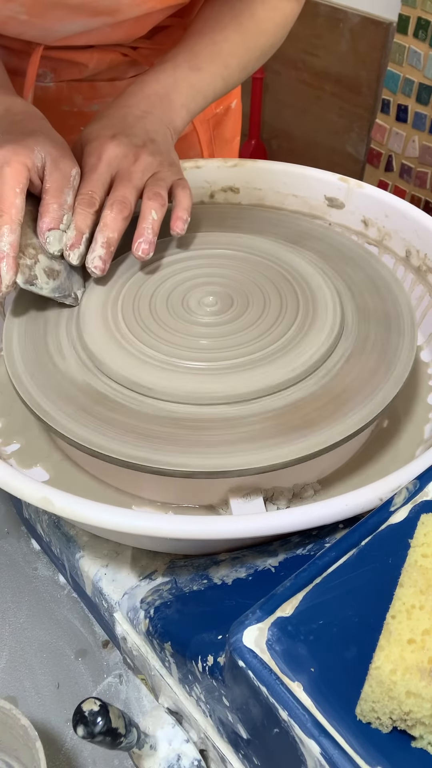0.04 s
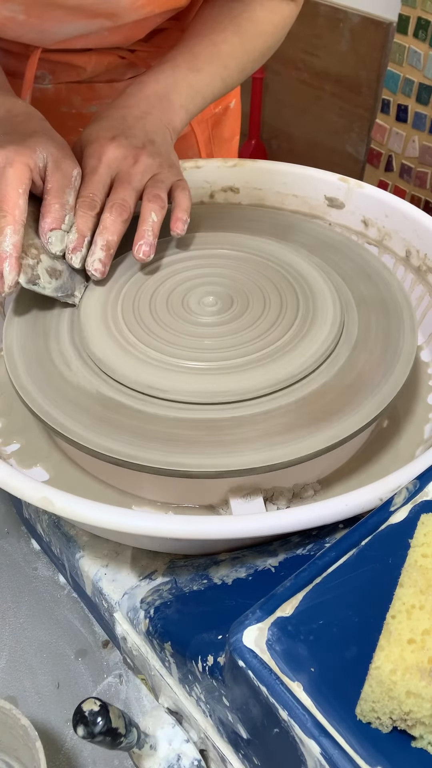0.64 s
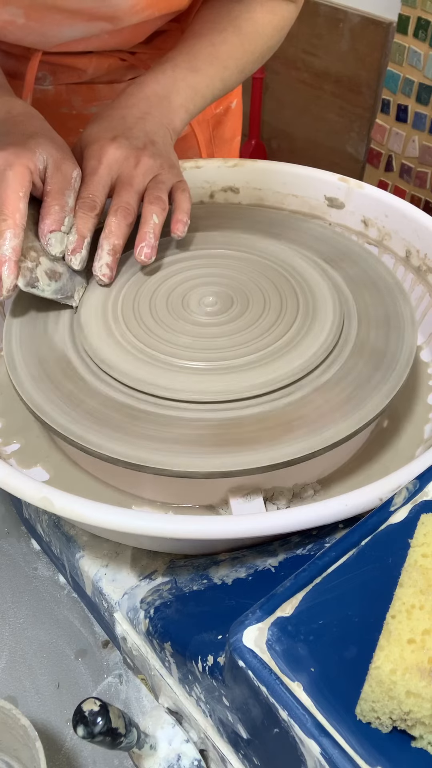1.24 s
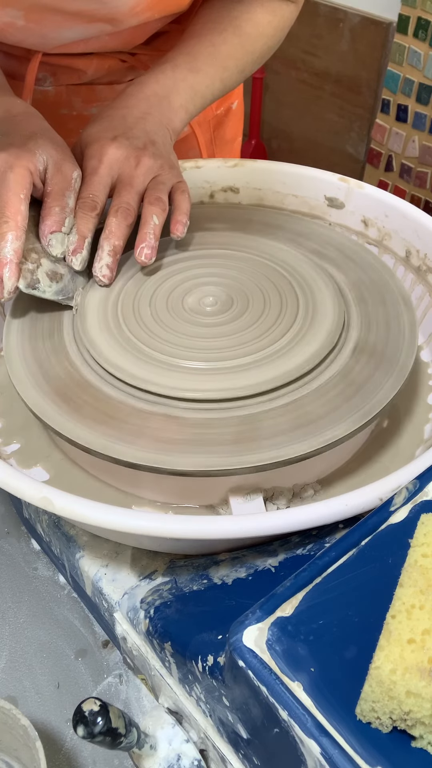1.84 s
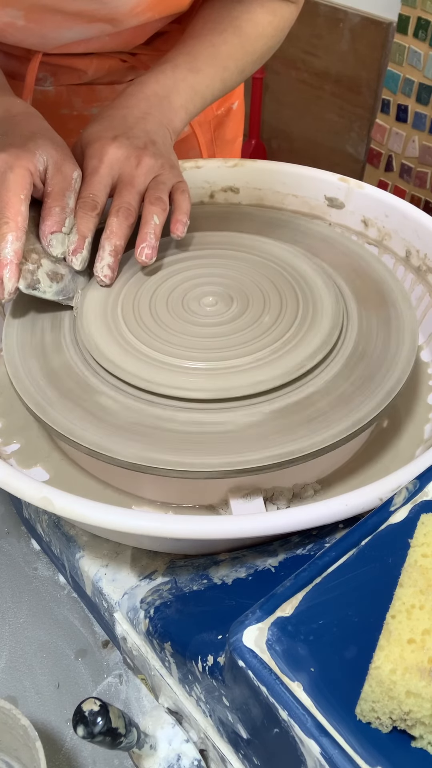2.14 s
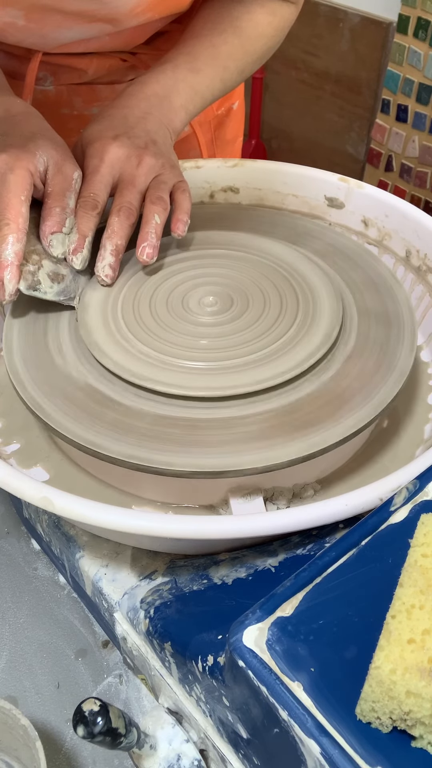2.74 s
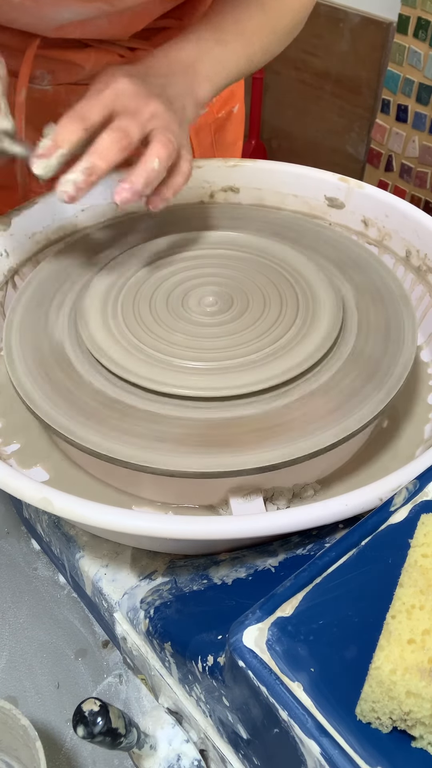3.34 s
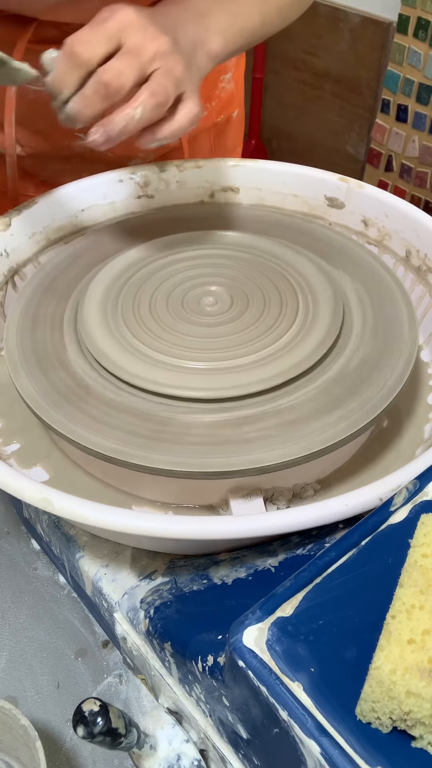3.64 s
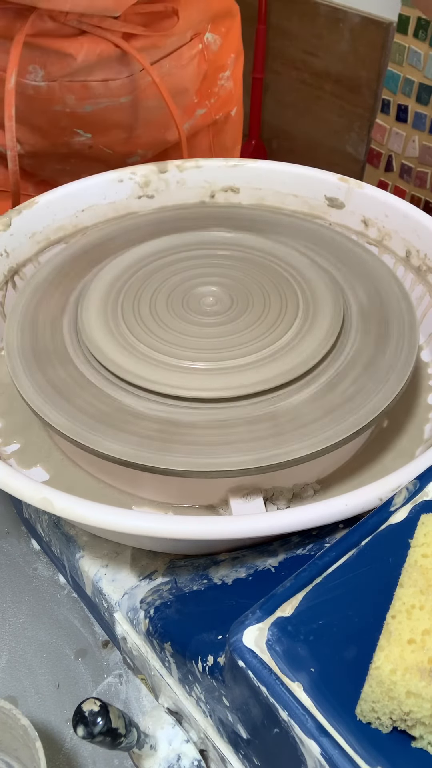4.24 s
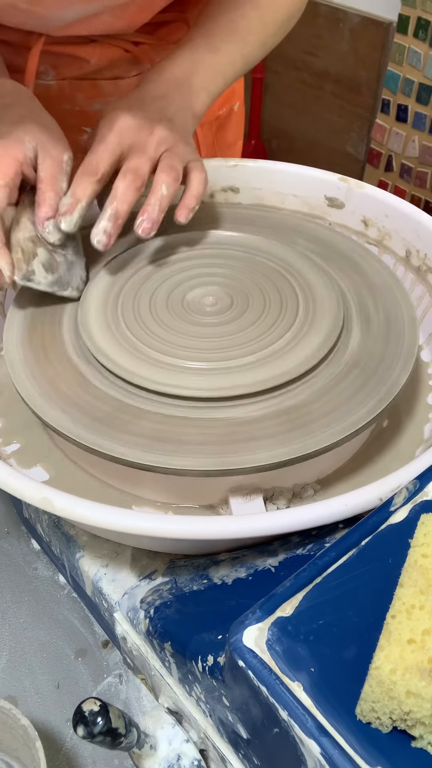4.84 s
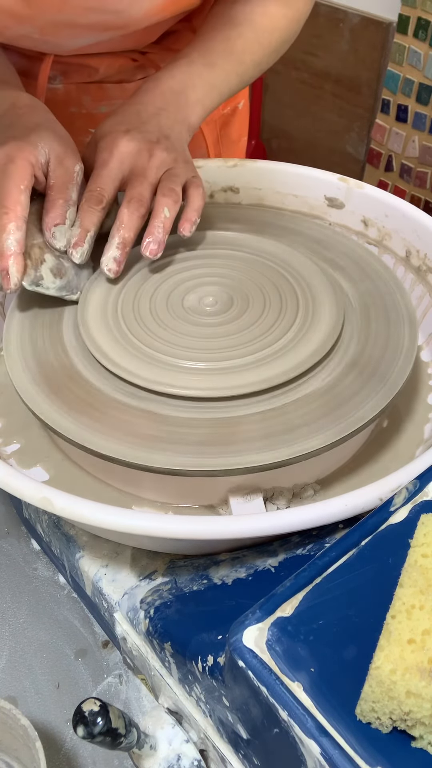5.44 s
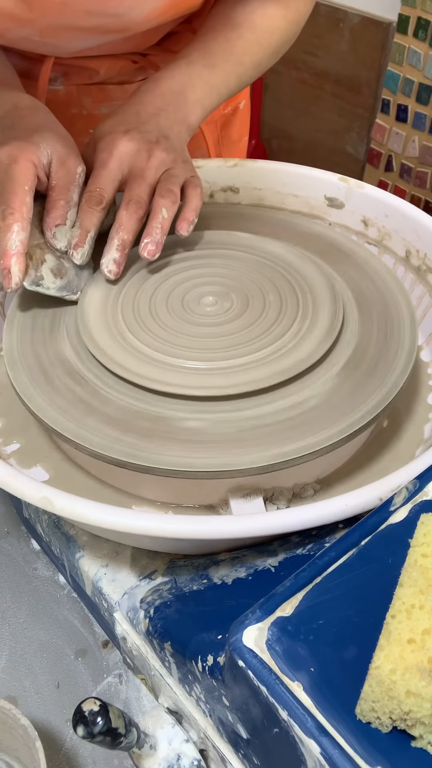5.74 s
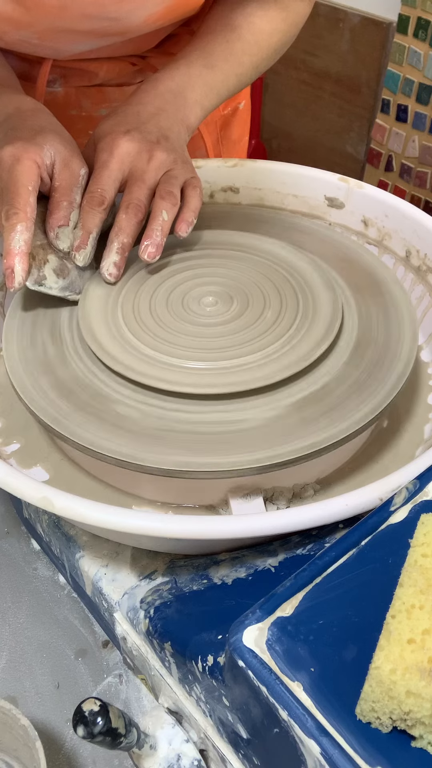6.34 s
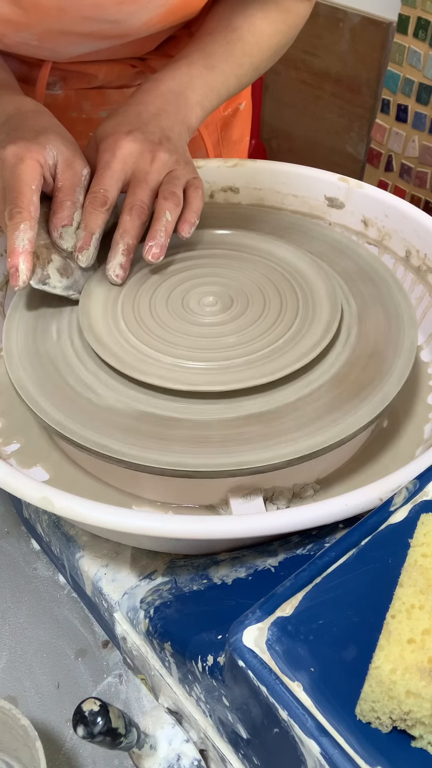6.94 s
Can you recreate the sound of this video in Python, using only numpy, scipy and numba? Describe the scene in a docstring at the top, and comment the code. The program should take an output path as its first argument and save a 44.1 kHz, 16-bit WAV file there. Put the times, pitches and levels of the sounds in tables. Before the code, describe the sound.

Gritty hiss of a blade on spinning wet clay stops for a whining wheel motor and a dull knock, then starts again.

```python
"""First comes the gritty hiss of a flat blade scraping wet clay on a humming electric potter's wheel.
There are two long strokes, heard close to a phone in a small room. Grit hisses under the blade and the
drag of the clay shakes the wheel; the brushed motor slows under load and whines up when freed.
In the pause a tool is put down beside the wheel, whose housing gives one dull, hollow knock."""
import sys
import numpy as np
from scipy import signal
from scipy.fft import rfft, irfft, next_fast_len
from scipy.io import wavfile
from scipy.ndimage import uniform_filter1d
from numba import njit

SR = 44100
rng = np.random.default_rng(int(sys.argv[2]) if len(sys.argv) > 2 else 0)


def digitize_waveform(pressure):
    """Quantize a signal to 16-bit integers and store it at the path in sys.argv[1].

    Rows of a 2-D input are taken as channels; values are limited to [-1, 1].
    """
    field = np.atleast_2d(pressure).T
    bounded = np.clip(field, -1, 1)
    quanta = np.round(bounded * 32767).astype(np.int16)
    wavfile.write(sys.argv[1], SR, quanta)


N = 317961
T = np.arange(N) / SR
SIZE = next_fast_len(N + SR // 2)
FREQ = np.maximum(np.arange(SIZE // 2 + 1) * SR / SIZE, 1)

# Tone (how strong the lows and highs are) of the wheel's running sounds: pitch_hz, level_db
RUMBLE_TONE = [(20, -48), (40, -30), (60, 4.5), (80, -12), (105, 2), (135, 4.5), (175, -2.5), (260, -28),
               (600, -58)]
AIR_TONE = [(60, 1), (180, -8), (300, 0), (520, -1), (750, 7), (960, 11), (1150, 1), (1450, 4), (1750, -4),
            (2400, -1), (3000, -7), (4200, -10), (5400, -6), (7000, -7), (11000, -15), (13000, -22),
            (16000, -34)]
WHINE_TONE = [(180, -4), (520, 5), (780, 2.5), (1100, 4), (1600, -8), (2800, 0), (3300, -2), (3700, -13.5),
              (5500, -36), (7500, -22), (11000, -24), (15000, -25)]
BUZZ_TONE = [(1000, 3), (1800, -1), (2300, -4), (2900, -5), (3500, 0), (4200, -2), (4800, 7), (6000, 4),
             (7500, -4), (11000, 0), (15000, -13)]
SWISH_TONE = [(1000, -30), (2400, -13), (3300, -14), (4200, -24), (5200, -9), (6400, -2), (7500, -3),
              (10000, -5), (12000, -22), (16000, -30)]
# Tone of a blow on the housing: pitch_hz, level_db
CRACK_TONE = [(150, -10), (400, 0), (900, 3), (1800, -2), (2800, -16), (3600, -6), (4600, -3), (5300, -2),
              (6000, 2), (7200, -6), (10500, -7), (15000, -10)]
CLUNK_TONE = [(120, -16), (380, -5), (750, -7), (1800, -10), (2800, -21), (9000, -28)]
# Tone of the grit, the ringing blade, the wet clay and the shaking wheel: pitch_hz, level_db
GRIT_TONE = [(600, -25), (1500, -5), (2400, 0), (2650, -5), (4000, -3), (4400, 0), (5250, 3), (6200, -.5),
             (7200, .5), (9000, 0), (11500, -6.5), (14000, -10.5), (15000, -12.5)]
RING_TONE = [(1500, -19.5), (2800, -1), (3300, 5), (3700, -19.5), (6000, -21.5)]
SMEAR_TONE = [(200, -28.5), (330, 9.5), (450, -0.5), (620, -0.5), (800, 2), (1100, -2), (1600, -0.5),
              (2400, -2), (4000, -34), (9000, -65)]
SHUDDER_TONE = [(50, -12), (130, 0), (190, -3), (255, -3), (300, 0), (350, 2.5), (440, -6), (520, -6),
                (700, -15), (2000, -43)]
# Where the motor, its brushes, the wheel and the blade ring: pitch_hz, width_hz, boost_db
MOTOR_PEAKS = [(224, 22, 23.5), (740, 90, 5), (904, 44, 20.5), (980, 45, 6), (1033, 70, 11), (1290, 40, 13),
               (1550, 70, 9), (1810, 60, 9), (2070, 70, 9.5), (2340, 160, 12.5), (2850, 150, 6)]
BRUSH_PEAKS = [(2380, 200, 4), (3650, 150, 5), (4900, 150, 6), (5200, 130, 5), (6600, 150, 5),
               (7500, 150, 3), (7850, 250, -7), (8200, 170, 8), (8840, 250, -7), (9400, 150, 12),
               (10250, 250, -5), (11150, 250, 6), (11900, 200, 7)]
WHEEL_PEAKS = [(226, 15, 5), (304, 34, 7), (603.6, 23, 4), (686, 44, 3), (770, 49, 4), (1035, 53, 4.5),
               (1260, 83, 4), (1985, 40, 3)]
BLADE_PEAKS = [(3300, 380, 6), (4350, 250, 2), (5200, 400, 2), (7350, 600, 3), (7880, 250, -8),
               (8300, 400, 2.5), (9050, 300, 3), (9800, 250, 3), (10200, 220, -7), (10500, 500, 4.5),
               (12600, 400, 5)]
# Slow swell of the rumble: time_s, level_db
RUMBLE_SWELL = [(0, 2.5), (1.3, 1.5), (1.6, 0), (3.7, -1), (4.4, -0.5), (5.2, -1), (7.2, 1.5)]
# Two faint taps, then a hollow knock and its quick rebounds: start_s, strength_db, cutoff_hz
KNOCKS = [(3.35, -24, 1900), (3.541, -23, 1800), (4.0892, 7, 9000), (4.096, -6.5, 3000), (4.1291, -2, 380),
          (4.147, -9, 2200), (4.159, -1.5, 360), (4.1656, -4.5, 360), (4.1922, -11, 420)]
# Notes the housing rings with: pitch_hz, level_db, fade_s (time to fall by 60 dB)
HOUSING_NOTES = [(113, -21, .3), (172, -10, .1), (268, -8, .06), (301, -5, .1), (345, -10, .07),
                 (385, -14, .08), (538, -7, .07), (587, -3, .08), (650, -7, .05), (730, -3, .045),
                 (786, 1, .055), (850, -8, .045), (1035, -4, .08), (1222, -11, .07), (1270, -11, .055),
                 (1464, -15, .08), (1760, -12, .08), (2250, -14, .07), (2430, -14, .06), (5950, -12, .02)]
# Strokes of the blade, the first already under way: touch_s, lift_s
STROKES = [(-.41, 3.04), (4.934, 7.5)]
# The hand's work, one list a stroke: time_s, pressure_db, drag_db, hollow_pitch_hz
HAND_MOVES = [
    [(0, 3.5, -2.5, 940), (.12, 5, -1.5, 970), (.22, 4, 2, 810), (.5, 1.5, -4.5, 750), (.62, -1, -11, 745),
     (.77, -0.5, -7, 750), (.81, 5.5, 1, 766), (1.2, 6, 0, 770), (1.42, 6.5, -3.5, 736), (1.55, 7, 2, 690),
     (1.7, 3.5, -4.5, 760), (1.95, 5, -2.5, 614), (2.2, 4.5, -4, 810), (2.33, 5.5, -1, 780),
     (2.84, 5, -2.5, 706), (2.94, 7.5, 5, 706)],
    [(4.97, 2, -0.5, 920), (5.05, 2.5, 7, 1150), (5.15, 3, 2.5, 1030), (5.225, 8, 8, 710),
     (5.265, 7.5, 3, 885), (5.31, 4.5, 6.5, 740), (5.44, 1, -1, 700), (5.72, 1.5, 1.5, 675),
     (5.86, 1, -2.5, 680), (6.13, 0, -0.5, 637), (6.57, 2.5, 0, 543), (6.66, -2, -1.5, 560),
     (6.87, 0, .5, 613), (7.01, -2.5, -1.5, 590), (7.15, 3.5, 4, 620)],
]
# Wet lumps that catch under the blade: middle_s, level_db, pitch_hz, half_length_s
LUMPS = [(.085, -46, 1250, .035), (.23, -51, 1850, .05), (.383, -45.5, 745, .045), (.555, -51, 760, .035),
         (.83, -50, 770, .045), (1.01, -49, 730, .035), (1.071, -49, 305, .054), (1.17, -49, 1040, .04),
         (1.62, -50, 300, .045), (1.958, -51.5, 540, .04), (2.331, -52, 313, .07),
         (2.622, -49.5, 704, .053), (2.752, -47.5, 460, .034), (2.944, -49, 725, .071),
         (3.013, -52, 515, .053), (5.075, -49, 1300, .04), (5.135, -49, 1090, .045),
         (5.161, -51, 330, .073), (5.19, -47, 690, .045), (5.245, -48, 1260, .04), (5.785, -53, 650, .05),
         (6.055, -49, 128, .052), (6.07, -52, 350, .05), (6.14, -51, 305, .05), (6.77, -49, 330, .059),
         (7.169, -44.5, 338, .086)]
# Coarse grains that crack under the blade: start_s, level_db, rise_s
SNAPS = [(6.2505, -32.5, .0003), (6.9364, -29.5, .0006), (7.1484, -29.5, .0007)]
# Hollows between blade, fingers and clay: pitch_multiple, width_share (of their pitch), level_db
HOLLOWS = [(1, 0.088, 4.5), (1.68, 0.23, -2), (2.7, 0.3, -6)]

FREE_HZ, LOADED_HZ = 258.8, 187  # brush ticks a second: motor running free, and fully loaded
TICKS_PER_TURN, BEARING_CYCLES_PER_TURN = 16, 57.7
HISS_DB, RING_DB, SMEAR_DB, SHUDDER_DB = -52, -57.5, -56, -60  # before pressure and drag are added


def amp(db):
    """Turn decibels into a gain."""
    return 10 ** (np.asarray(db) / 20)


def unit(x):
    """Scale to an average (rms) level of 1."""
    return x / np.sqrt(np.mean(x ** 2))


def curves(table):
    """Join each column's points with straight lines in time."""
    times, *columns = np.transpose(table)
    return [np.interp(T, times, column) for column in columns]


def wobble(per_s):
    """A smooth random wobble of size about 1."""
    hold = max(int(SR / per_s), 2)
    steps = np.repeat(rng.standard_normal(N // hold + 1), hold)
    return unit(uniform_filter1d(steps, hold)[:N])


def shape(x, tone, peaks=()):
    """Filter a sound to a broad tone with narrow peaks and dips on top."""
    hz, db = np.transpose(tone)
    db = np.interp(np.log(FREQ), np.log(hz), db)
    for centre, width, boost in peaks:
        db = db + boost / (1 + (2 * (FREQ - centre) / width) ** 2)
    # this folding makes the filter ring after a hit, never before it
    cepstrum = irfft(np.log(amp(db)), SIZE)
    cepstrum[1:SIZE // 2] *= 2
    cepstrum[SIZE // 2 + 1:] = 0
    return irfft(rfft(x, SIZE) * np.exp(rfft(cepstrum)), SIZE)[..., :N]


def grains(per_s, spread_db):
    """Many tiny hits of unequal size."""
    hits = (rng.random(N) < per_s / SR) * rng.standard_normal(N)
    return unit(hits * amp(spread_db * rng.standard_normal(N)))


def tick_train(ticks):
    """One sharp tick a cycle, made of 60 equally strong harmonics."""
    phase = np.pi * (ticks % 1 - .5) + 1e-9
    return np.sin(121 * phase) / np.sin(phase) - 1


@njit
def resonance(x, hz, width_share):
    """Let through only a band around a moving pitch."""
    y, band, low = np.empty(len(x)), 0., 0.
    for i in range(len(x)):
        g = np.tan(np.pi * hz[i] / SR)
        v = (band + g * (x[i] - low)) / (1 + g * (g + width_share))
        band, low, y[i] = 2 * v - band, low + 2 * g * v, width_share * v
    return y


def place(x, near_db, room_db, pan_db=0, left_delay_s=.000114):
    """Sound reaches the right microphone first; the nearby splash pan and the room add echoes."""
    t = T[:SR // 2]

    def tail(noise, fade_s):
        return rfft(unit(noise * amp(-60 * t / fade_s) * (t > .002)), SIZE) / np.sqrt(len(t))

    near, low, high = rng.standard_normal((3, 2, len(t)))
    dull = 1 / (1 + (FREQ / 2500) ** 2)
    room = np.sqrt(dull) * tail(low, fade_s=.42) + .03 * np.sqrt(1 - dull) * tail(high, fade_s=.33)
    echoes = amp(near_db) * tail(near, fade_s=.05) * FREQ / (FREQ + 500) + amp(room_db) * room
    alike = 1 / (1 + (FREQ / 800) ** 2)  # long waves reach both microphones alike
    echoes = np.array([echoes[0], alike * echoes[0] + np.sqrt(1 - alike ** 2) * echoes[1]])
    direct = np.exp(-2j * np.pi * FREQ * np.array([[left_delay_s], [0]]))
    balance = amp(np.array([[pan_db], [-pan_db]]) / 2)
    return irfft(rfft(x, SIZE) * (direct + echoes), SIZE)[:, :N] * balance


def hand():
    """Pressure (dB), drag (dB) and the pitch of the hollow under the blade (Hz) over time."""
    return curves([point for stroke in HAND_MOVES for point in stroke])


def contact(bite_s=.0067, lift_s=.099):
    """How fully the blade lies on the clay, 0 to 1: a quick bite, a hold and a slower lift."""
    return sum(np.clip(np.minimum((T - touch) / bite_s, (lift - T) / lift_s), 0, 1)
               for touch, lift in STROKES)


def rumble_and_air():
    """Bearings rumble through the frame, louder under the blade; cooling air rushes through the motor."""
    rumble = unit(shape(rng.standard_normal(N), RUMBLE_TONE))
    rumble *= amp(-59 + curves(RUMBLE_SWELL)[0] + 2 * contact() + .31 * wobble(6.7))
    air = unit(shape(rng.standard_normal(N), AIR_TONE)) * amp(-58 + wobble(11))
    return place(rumble, near_db=-12, room_db=-17, pan_db=2) + place(air, near_db=-20, room_db=0)


def motor_rate(sag_hz_per_s=36, rise_before_lift_s=.44, recover_s=.59):
    """Brush ticks a second: drag slows the motor; its whine rises again shortly before a scrape ends."""
    _, drag_db, _ = hand()
    pull = sag_hz_per_s * amp(np.minimum(drag_db, 0))
    sag = 0
    for touch, lift in STROKES:
        rise_at = lift - rise_before_lift_s
        lost_hz = sag_hz_per_s * max(-touch, 0) + np.cumsum(pull * (T > touch) * (T < rise_at)) / SR
        still_lost = np.exp(-(np.maximum(T - rise_at, 0) / recover_s) ** 1.6)  # spin-up starts gently
        sag = sag + np.minimum(lost_hz, FREE_HZ - LOADED_HZ) * still_lost
    return FREE_HZ - sag


def motor(hardest_press_s=3.731):
    """The brushes tick over the motor's spinning contacts and press harder once in each turn."""
    rate = motor_rate()
    ticks = np.cumsum(rate * (1 + .0015 * wobble(9))) / SR
    turns = (ticks - np.interp(hardest_press_s, T, ticks)) / TICKS_PER_TURN
    press = ((1 + np.cos(2 * np.pi * turns)) / 2) ** 1.8 * amp(1.5 * wobble(16))
    whine = unit(shape(tick_train(ticks + .003 * wobble(90)), WHINE_TONE, MOTOR_PEAKS))
    hum = signal.sosfilt(signal.butter(2, 2000, fs=SR, output="sos"), whine)
    # each tick comes a little early or late and has its own strength
    chatter = tick_train(ticks + .007 * wobble(60)) * amp(3 * wobble(FREE_HZ))
    buzz = unit(shape(chatter, BUZZ_TONE, BRUSH_PEAKS))
    bearing = amp(-62.5) * np.sin(2 * np.pi * BEARING_CYCLES_PER_TURN * turns + .7 * wobble(30))
    swish = unit(shape(rng.standard_normal(N), SWISH_TONE, BRUSH_PEAKS))
    brushes = amp(-65) * buzz * (1 + .4 * press) + amp(-60) * swish * (.2 + press)
    hum *= amp(-57.5 + 2 * contact() + 1.3 * wobble(14))  # grows while the blade brakes the wheel
    speed = rate / FREE_HZ  # a slower motor is quieter
    return place(speed * (hum + bearing - brushes), near_db=-30, room_db=-20)


def knocks():
    """Each blow makes the hollow housing crack and ring; softer contacts sound duller."""
    push = np.zeros(N)
    t = T[:SR // 2]
    for start_s, strength_db, cutoff_hz in KNOCKS:
        force = t * np.exp(-2 * np.pi * cutoff_hz * t)
        start = int(start_s * SR)
        push[start:start + len(t)] += amp(strength_db) * force / force.sum()
    # neighbouring notes swing in opposite directions
    ring = sum((-1) ** k * amp(db - 60 * t / fade_s) * np.sin(2 * np.pi * hz * t)
               for k, (hz, db, fade_s) in enumerate(HOUSING_NOTES))
    crack = shape(rng.standard_normal(len(t)) * np.exp(-t / .0032), CRACK_TONE)[:len(t)]
    # the panels' many weaker notes blur into a short clunk
    clunk = shape(rng.standard_normal(len(t)) * np.exp(-t / .022), CLUNK_TONE)[:len(t)]
    blow = amp(-26) * ring + amp(-20) * crack + amp(-21) * clunk
    # the blow carries no deep bass
    blow = signal.sosfilt(signal.butter(3, 105, "high", fs=SR, output="sos"), blow)
    sound = signal.fftconvolve(push, blow)[:N]
    # the boom of the whole housing lies to the left of the struck spot
    boom = signal.sosfiltfilt(signal.butter(3, 430, fs=SR, output="sos"), sound)
    return (place(boom, near_db=-20, room_db=-8, pan_db=3.2)
            + place(sound - boom, near_db=-14, room_db=-8, pan_db=-1.2))


def squelches(small_per_s=6, low_hz=497, high_hz=1330, slips_per_s=500):
    """A wet lump briefly sticks and slips with a hollow pitch of its own; small ones come at random."""
    out = np.zeros(N)
    _, drag_db, _ = hand()
    touching = contact()
    small_lumps = []
    for when, size, pitch in rng.random((int(small_per_s * N / SR), 3)):
        i = int(when * N)
        if touching[i] > .5:
            db = -57 + drag_db[i] / 2 + 2 * (2 * size - 1)
            small_lumps.append((T[i], db, low_hz * (high_hz / low_hz) ** pitch, .035))
    for middle_s, db, hz, half_length_s in LUMPS + small_lumps:
        n = int(2 * half_length_s * SR)
        slips = rng.standard_normal(n) * (rng.random(n) < slips_per_s / SR)
        band = signal.butter(1, [hz / 1.085, hz * 1.085], "band", fs=SR, output="sos")
        lump = unit(signal.sosfilt(band, slips) * np.hanning(n)) * np.sqrt(3 / 8)
        start = max(int((middle_s - half_length_s) * SR), 0)
        out[start:start + n] += amp(db) * lump[:N - start]
    return place(out, near_db=-8, room_db=-15)


def snaps():
    """Single coarse grains crack against the blade, each with a tiny bright crunch."""
    force = np.zeros(N)
    for start_s, db, rise_s in SNAPS:
        age = np.maximum(T - start_s, 0) / rise_s
        force += amp(db) * age * np.exp(1 - age)
    bright = [(1000, -16), (4000, -8), (7000, -5), (8500, 0), (11000, -1), (14500, -5), (16000, -10)]
    return shape(force * rng.standard_normal(N), bright)


def crumbs(drag_db, per_s=55, fade_s=.002):
    """The grit's gain jumps as a firm crumb meets the edge, more under drag, and falls as it breaks."""
    hits = (rng.random(N) < per_s / SR) * rng.rayleigh(np.sqrt(.5), N) * amp(drag_db)
    return unit(1 + .42 * signal.fftconvolve(hits, np.exp(-T[:SR // 20] / fade_s))[:N])


def hollows(x, pitch_hz, drift_octaves=.17, shifts_per_s=14, flicker_db=3.5):
    """Pockets under the blade open, close and shift in pitch as the clay keeps reshaping them."""
    out = x
    for multiple, width_share, level_db in HOLLOWS:
        hz = multiple * pitch_hz * 2 ** (drift_octaves * wobble(shifts_per_s))
        gain = amp(level_db + flicker_db * wobble(2 * shifts_per_s))
        out = out + resonance(x, hz, float(width_share)) * gain
    return out


def scrape():
    """Grit strikes the blade and rings it; wet clay grips and slips in lumps, shaking the wheel."""
    pressure_db, drag_db, hollow_hz = hand()
    touching = contact()
    lumpy, uneven = wobble(45), wobble(18)  # the layers flicker over the uneven clay
    hiss = unit(shape(grains(per_s=20000, spread_db=2.4), GRIT_TONE, BLADE_PEAKS))
    hiss *= touching * amp(HISS_DB + pressure_db + .25 * uneven + .8 * lumpy)
    ring = unit(shape(grains(per_s=9000, spread_db=2.6), RING_TONE))
    ring *= touching * amp(RING_DB + .45 * pressure_db + .59 * drag_db + .4 * uneven)
    slips = grains(per_s=3500, spread_db=1.9) * amp(1.1 * lumpy + 1.8 * wobble(130))
    smear = unit(hollows(shape(slips, SMEAR_TONE, WHEEL_PEAKS), hollow_hz))
    smear *= touching * amp(SMEAR_DB + drag_db + .5 * uneven)
    jolts = grains(per_s=900, spread_db=.55) * amp(.29 * lumpy)
    shudder = unit(shape(jolts, SHUDDER_TONE, WHEEL_PEAKS))
    slowed = (FREE_HZ - motor_rate()) / (FREE_HZ - LOADED_HZ)  # a slowed wheel sticks and slips harder
    shudder *= touching * amp(SHUDDER_DB + .88 * drag_db + 6.5 * slowed + 1.1 * uneven)
    blade = place((hiss + ring) * crumbs(drag_db) + snaps(), near_db=-14, room_db=-18, pan_db=.1)
    wheel = place(shudder, near_db=-8, room_db=-13, pan_db=.5)
    clay = place(smear, near_db=5.5, room_db=2.5, pan_db=.5)
    return blade + wheel + clay


def scene():
    """The blade on the clay, the running wheel and the knocks, added together."""
    return scrape() + motor() + rumble_and_air() + knocks() + squelches()


def record(dry):
    """The phone cuts the deepest bass and the highest treble."""
    thin = signal.sosfilt(signal.butter(3, 38, "high", fs=SR, output="sos"), dry)
    return signal.sosfilt(signal.ellip(8, .2, 70, 15800, fs=SR, output="sos"), thin)


dry = scene()
out = record(dry)
digitize_waveform(out)
```